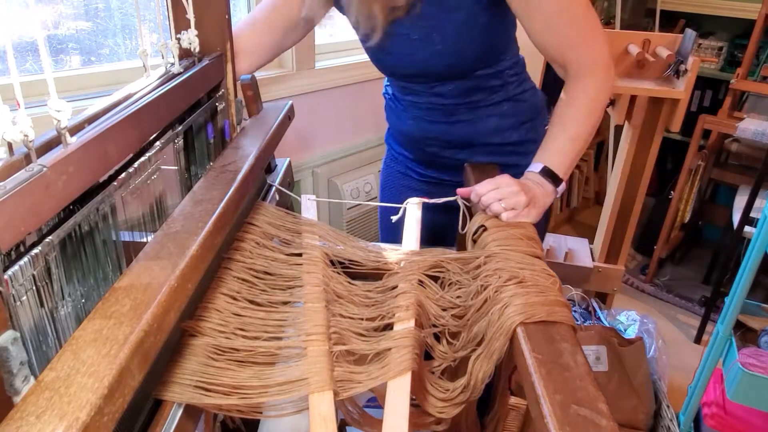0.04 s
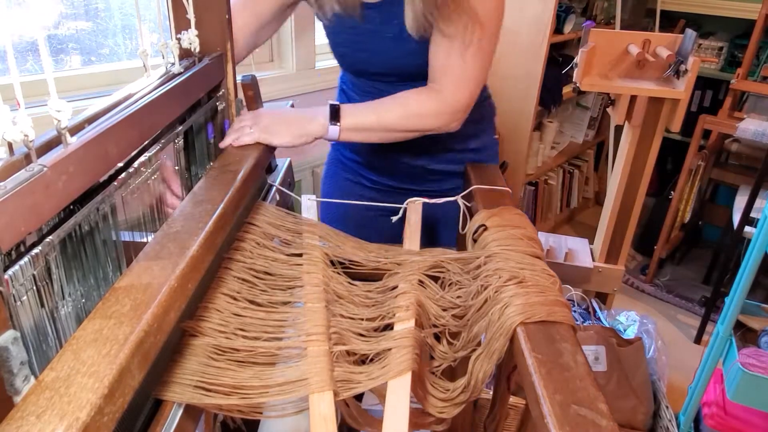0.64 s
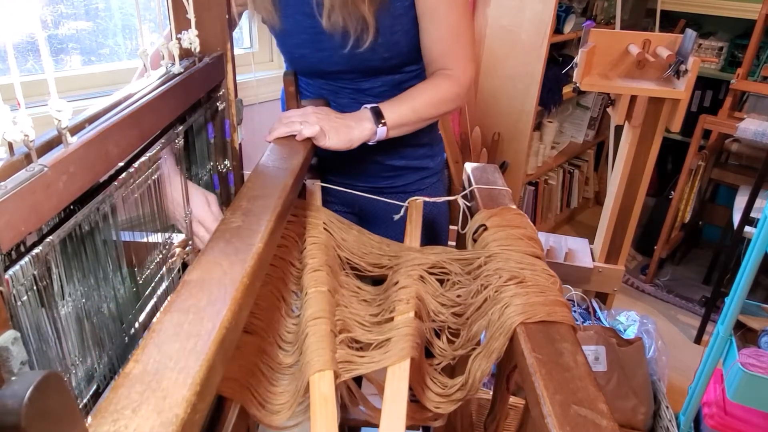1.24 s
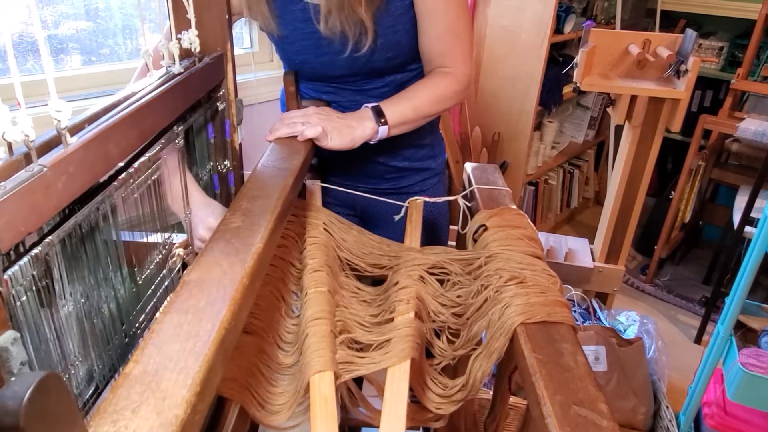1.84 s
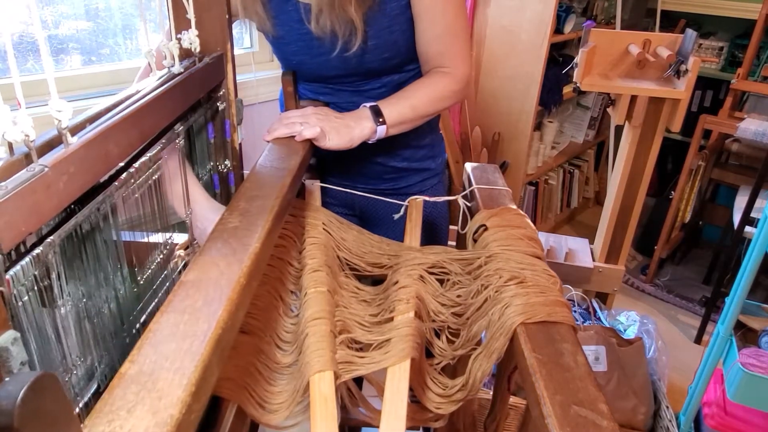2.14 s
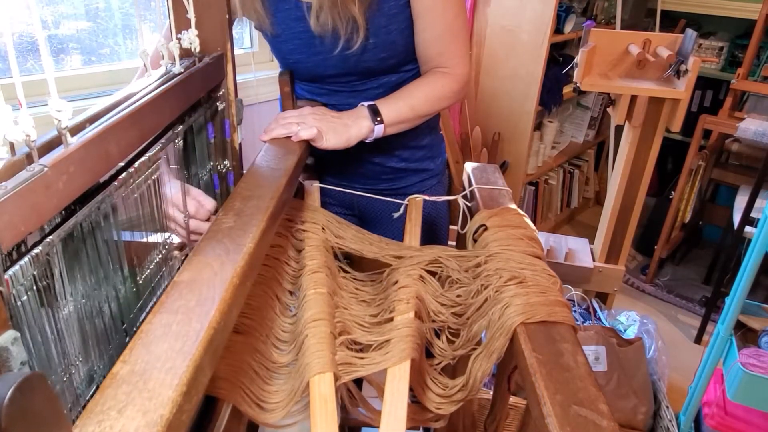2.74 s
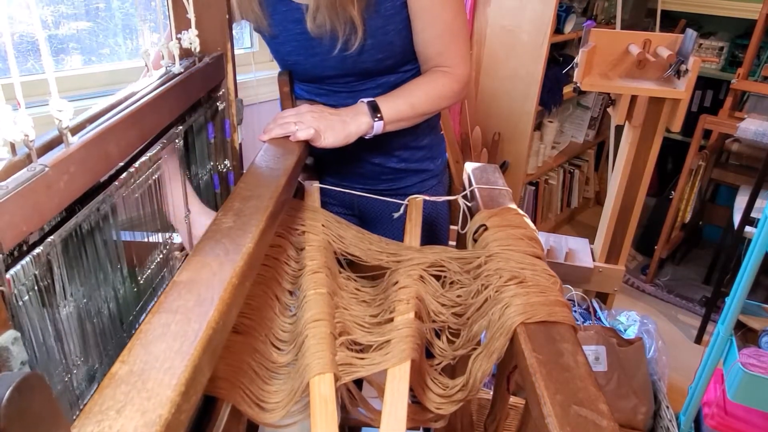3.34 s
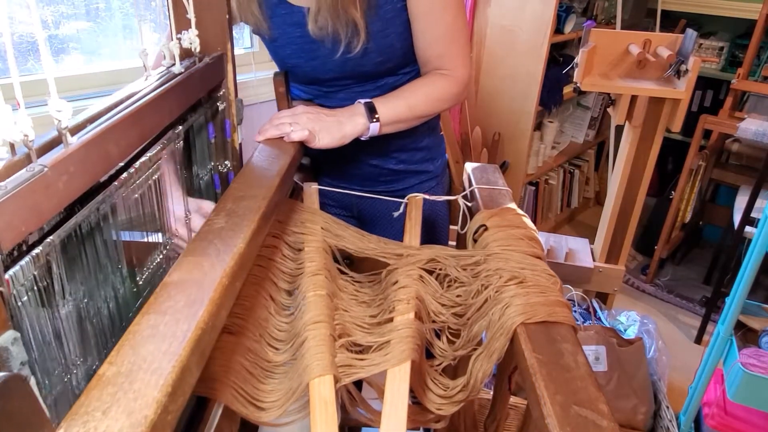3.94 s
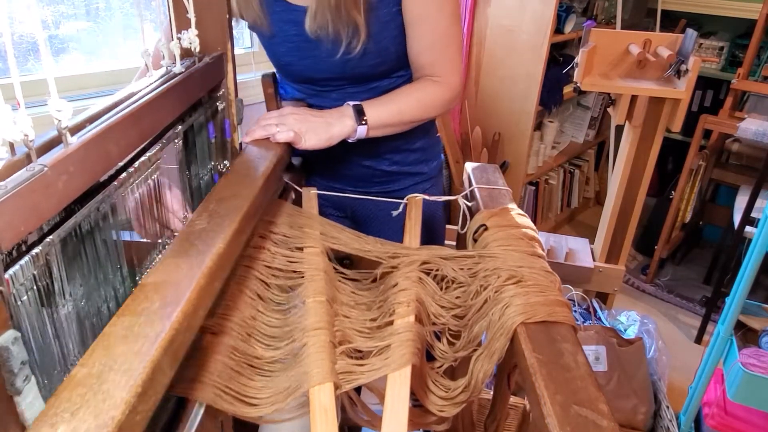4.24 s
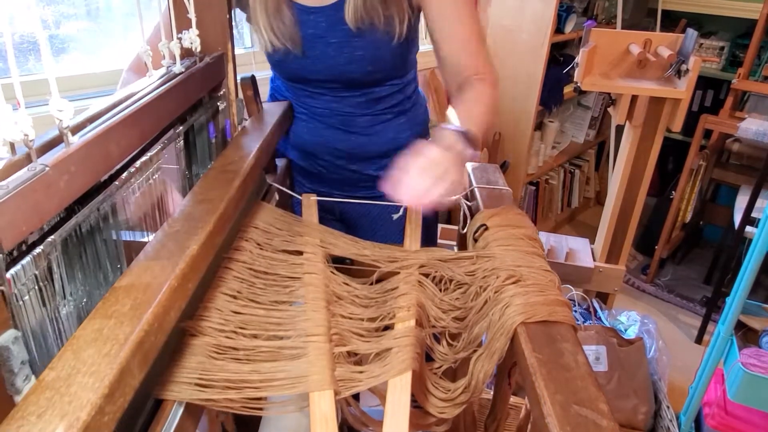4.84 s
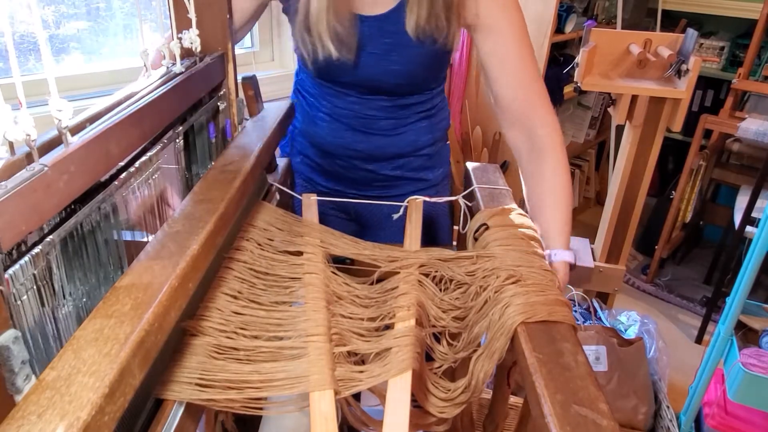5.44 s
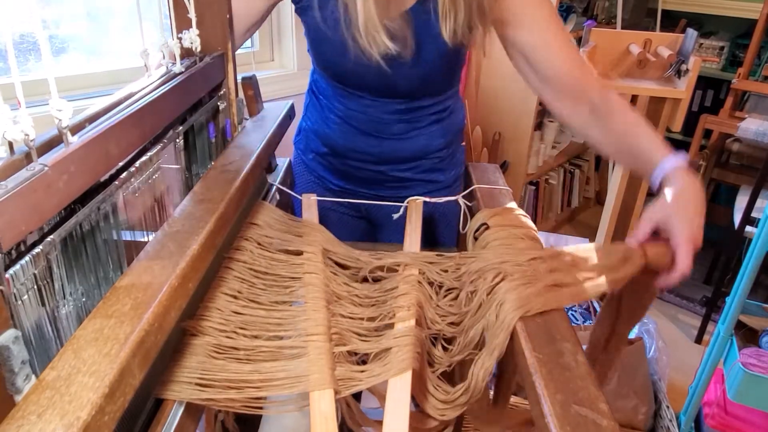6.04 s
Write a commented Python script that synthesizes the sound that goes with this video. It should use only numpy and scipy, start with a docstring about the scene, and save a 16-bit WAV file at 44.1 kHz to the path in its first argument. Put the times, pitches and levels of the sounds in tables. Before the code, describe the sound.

Light wooden knocks and jingling steel wires on a weaving loom, with one sharp metal click and then a dull thump.

```python
"""A wooden floor loom in a small room, close to a stereo microphone, as a weaver spreads the warp.
From the start the wooden frames knock and steel heddles jostle and slide along their rods.
The beater clacks at 1.1 s, the heddles are stirred again, and at 3.6 s a steel rod snaps into its seat.
At 4.5 s the beater swings back with a dull thump; then the jingling thins out into the room's hiss."""
import sys
import numpy as np
from scipy import signal
from scipy.fft import rfft, irfft, next_fast_len
from scipy.io import wavfile
from scipy.ndimage import uniform_filter1d, map_coordinates

SR = 44100
rng = np.random.default_rng(int(sys.argv[2]) if len(sys.argv) > 2 else 0)


def file_out(sig):
    """Save sig as 16-bit WAV at sys.argv[1]."""
    # one column per channel
    cols = np.atleast_2d(sig).T
    # limit, then scale
    lim = np.clip(cols, -1, 1)
    pcm = np.round(lim * 32767).astype(np.int16)
    wavfile.write(sys.argv[1], SR, pcm)


N = 273331

# resonances of the heddle wires: (frequency [Hz], width [Hz], level [dB])
HEDDLE_MODES = [(2330, 35, -35), (2760, 69, -6.5), (2933, 77, -8), (3217, 160, -4.5), (3490, 130, -14),
                (3693, 62, -4), (3890, 120, -7.5), (4480, 410, 0), (5100, 244, -9.5), (5920, 65, -5),
                (6250, 99, -7.5), (7100, 68, -4.5)]
# broad ring of the steel beneath them: (frequency [Hz], level [dB])
STEEL_COLOUR = [(900, -30.5), (1800, -21), (2600, -7.5), (3200, 1), (4400, -3.5), (5500, -7), (7100, -9),
                (8000, -24.5), (11000, -38.5)]
# sizzle of tiny steel contacts: (frequency [Hz], level [dB])
SIZZLE_COLOUR = [(3000, -47), (6500, -9), (8200, -13), (9500, -11), (11000, -7), (13300, -1), (15500, 0)]


def amp(db):
    """Decibels to gain."""
    return 10 ** (np.asarray(db) / 20)


def unit(x):
    """Scale to rms 1."""
    return x / np.sqrt(np.mean(x ** 2) + 1e-20)


def burst(x):
    """Scale a short sound to the energy of 20 ms at rms 1."""
    return x / np.sqrt(np.sum(x ** 2) / (SR * .02) + 1e-20)


def along(points, hz):
    """Read (frequency [Hz], value) points on a log axis."""
    freqs, values = np.transpose(points)
    return np.interp(np.log(hz + 1), np.log(freqs + 1), values)


def wobble(rate):
    """A smooth random curve, rate knots a second."""
    return map_coordinates(rng.standard_normal(int(N * rate / SR) + 4), [np.arange(N) * rate / SR])


def fade(t60):
    """Half a second of exponential decay, falling 60 dB in t60 seconds."""
    return np.exp(-np.log(1000) * np.arange(SR // 2) / SR / t60)


def stroke(s, rise, fall):
    """The samples that a stroke peaking at time s covers, and its strength on each."""
    start = max(round((s - 3 * rise) * SR), 0)
    part = np.arange(start, min(start + SR, N))
    t = part / SR - s
    return part, np.exp(-(t / np.where(t < 0, rise, fall)) ** 2 / 2)


def add(out, s, x):
    """Mix a stereo sound in at time s."""
    start = max(round(s * SR), 0)
    out[:, start:start + x.shape[1]] += x[:, :N - start]


def coloured(x, gain):
    """Causal (minimum-phase) filter with the given gain over frequency."""
    n = x.shape[-1]
    m = 2 * next_fast_len(n // 2 + 4096)
    cepstrum = irfft(np.log(np.maximum(gain(np.fft.rfftfreq(m, 1 / SR)), 1e-6)), m)
    cepstrum[1:m // 2] *= 2
    cepstrum[m // 2 + 1:] = 0
    return irfft(rfft(x, m) * np.exp(rfft(cepstrum)), m)[..., :n]


def shaped(x, spectrum):
    """Colour x with (frequency [Hz], level [dB]) points."""
    return coloured(x, lambda hz: amp(along(spectrum, hz)))


def evened(x, width_hz):
    """Level out the broad humps of a decaying noise, keeping its fine structure."""
    m = 4 * len(x)
    power = np.abs(rfft(x, m)) ** 2
    humps = np.abs(uniform_filter1d(power, max(int(width_hz * m / SR), 1))) + 1e-12
    return coloured(x, lambda hz: np.interp(hz, np.fft.rfftfreq(m, 1 / SR), humps ** -.5))


def ring(modes, scatter_db, max_t60):
    """Struck modes, at new strengths for each blow; neighbours start in opposite directions."""
    t = np.arange(SR // 2) / SR
    out = np.zeros(len(t))
    for k, (hz, db, t60) in enumerate(modes):
        strength = (-1) ** k * amp(db + scatter_db * rng.normal())
        out += strength * np.sin(2 * np.pi * hz * t) * fade(min(t60, max_t60))
    return burst(out)


def crack(spectrum, t60):
    """The dense, quickly dying part of a blow."""
    noise = rng.standard_normal(SR // 2) * fade(t60)
    return burst(shaped(evened(noise, width_hz=306), spectrum))


def contacts(rate, spread_db):
    """Tiny impacts of unequal size, about rate a second; rms 1."""
    size = np.minimum(rng.standard_normal(N), 2)
    hits = rng.random(N) < rate / SR
    return unit(hits * rng.choice([-1, 1], N) * amp(spread_db * size))


def spread(mid, side, hz):
    """The microphone's two close capsules hear diffuse bass alike and diffuse treble unrelated."""
    # likeness of the room's sound left and right: (frequency [Hz], correlation [-1..1])
    likeness = [(100, 0.79), (250, 0.31), (500, 0.5), (1000, -0.2), (2500, -0.069), (5000, -0.091),
                (9000, -0.16)]
    turn = np.arccos(np.clip(along(likeness, hz), -1, 1)) / 2
    common, apart = np.cos(turn) * mid, np.sin(turn) * side
    return np.array([common + apart, common - apart])


def diffuse_noise(spectrum):
    """Coloured stereo noise reaching the microphone from all sides; rms 1."""
    mid, side = rfft(shaped(rng.standard_normal((2, N)), spectrum))
    return unit(irfft(spread(mid, side, np.fft.rfftfreq(N, 1 / SR)), N))


def in_room(x, wet_db):
    """Direct sound plus a fresh diffuse tail for each capsule; the total energy is kept."""
    # reverberation of the small room: (frequency [Hz], t60 [s])
    decay_times = [(80, 0.62), (400, 0.31), (1000, 0.31), (4000, 0.27), (9000, 0.27), (15000, 0.2)]
    hz, t, noise = signal.stft(rng.standard_normal((2, SR // 2)), SR, nperseg=256)
    decay = np.exp(-np.log(1000) * t / along(decay_times, hz)[:, None])
    _, tails = signal.istft(spread(*noise, hz[:, None]) * decay, SR, nperseg=256)
    tails = tails[:, :SR // 2] * (1 - fade(0.0033))
    response = amp(wet_db) * tails / np.linalg.norm(tails, axis=1, keepdims=True)
    response[:, 0] += 1  # the direct path
    return signal.fftconvolve(x[None], response, axes=1)[:, :len(x)] / np.sqrt(1 + amp(wet_db) ** 2)


def room_tone():
    """The quiet room and the microphone's hiss."""
    # steady noise floor: (frequency [Hz], level [dB])
    floor_colour = [(15, -49), (25, -13), (76, -5.5), (216, -14.5), (261, -21.5), (449, -18), (710, -23.5),
                    (2150, -26.5), (3220, -21), (3990, -18.5), (6490, -13), (8050, -25), (10800, -31.5),
                    (15800, -24.5)]
    return amp(-72) * diffuse_noise(floor_colour)


def sway():
    """The frame rumbles faintly under the hands and swells with each lean."""
    # a hand leans on the frame: (peak time [s], level [dB])
    leans = [(.35, -63), (.85, -62), (1.14, -66), (2.02, -73), (2.77, -71), (4.73, -70)]
    # the frame's rumble: (frequency [Hz], level [dB])
    rumble_colour = [(20, -21), (38, -11), (70, 7), (110, -1.5), (170, -13), (300, -15.5), (700, -36.5),
                     (2000, -66)]
    resting_db = -76.5
    load = amp(resting_db + 1.43 * wobble(1.7))
    for s, db in leans:
        part, push = stroke(s, rise=.05, fall=0.057)
        load[part] += amp(db) * push
    return load * diffuse_noise(rumble_colour)


def rubs():
    """Wood and thread drag across the beams, setting off dense runs of tiny slips."""
    # each drag: (peak time [s], level [dB], rise [s])
    drags = [(.177, -66, 0.011), (.745, -60, 0.038), (.98, -64.5, .045), (1.048, -62, 0.024),
             (2.22, -60.5, 0.009), (2.594, -63.5, .016), (3.355, -66, .015), (4.03, -67, .015),
             (4.39, -84, 0.085), (4.529, -55, 0.0096), (4.562, -36.5, 0.0051), (5.075, -59, 0.016),
             (5.57, -83, 0.16)]
    # the slipping timbers: (frequency [Hz], level [dB])
    drag_colour = [(100, -7), (350, -7.5), (700, -2), (880, 0), (1050, -3.5), (1300, -3.5), (1700, -17),
                   (3000, -11.5), (8000, -26)]
    out = np.zeros((2, N))
    slips = unit(shaped(contacts(rate=1200, spread_db=0.5), drag_colour))
    for s, db, rise in drags:
        part, push = stroke(s, rise, fall=1.25 * rise)
        add(out, part[0] / SR, amp(db) * in_room(push * slips[part], wet_db=5))
    return out


def wires(x, body_db):
    """Contacts x excite the heddles' narrow resonances, which stand on a broad steel ring."""
    def gain(hz):
        peaks = sum(amp(db) ** 2 / (1 + (2 * (hz - centre) / width) ** 2)
                    for centre, width, db in HEDDLE_MODES)
        return amp(along(STEEL_COLOUR, hz)) * np.sqrt(amp(body_db) ** 2 + peaks)
    return unit(coloured(x, gain))


def bunch(x, depth_db, spacing_hz):
    """Every bunch of heddles has its own irregular set of resonances."""
    knots = rng.standard_normal(512)
    ripple = lambda hz: amp(depth_db * map_coordinates(knots, [hz / spacing_hz], mode="mirror"))
    return unit(coloured(x, ripple))


def jingle(rate, detune, t60):
    """Single free heddles ring briefly, each near one of the wire resonances; rms 1."""
    centres, _, levels = np.transpose(HEDDLE_MODES)
    when, pick = rng.random((2, int(rate * N / SR)))
    tune, size = rng.standard_normal((2, len(when)))
    mode = (pick * len(centres)).astype(int)
    hz = centres[mode] * np.exp(detune * tune)
    gain = amp(levels[mode] + along(STEEL_COLOUR, hz) + 2.4 * size)
    step = np.arange(SR // 16)
    pings = gain[:, None] * np.sin(2 * np.pi * hz[:, None] * step / SR) * fade(t60)[step]
    samples = (when * N).astype(int)[:, None] + step
    return unit(np.bincount(samples.ravel(), pings.ravel(), N)[:N])


def jostle():
    """Hundreds of hanging heddles touch; the ring shifts as the hand passes from bunch to bunch."""
    # how strongly the hand stirs them: (time [s], level [dB])
    stirring = [(0.0, -69), (0.59, -80.5), (0.81, -65), (1.03, -72), (1.16, -75.5), (1.62, -81.5),
                (1.78, -72.5), (1.91, -95), (2.28, -65.5), (2.41, -58), (2.54, -60), (3.26, -69.5),
                (3.76, -60), (4.7, -59.5), (4.9, -65), (5.25, -67), (5.56, -75), (6.2, -76.5)]
    stir_db = np.interp(np.arange(N) / SR, *np.transpose(stirring))
    flicker_db = 2.4 * wobble(21.82)
    ring_db = stir_db + flicker_db + 1.5
    sizzle_db = -61.5 + .6 * (stir_db + 67) + flicker_db  # grows more slowly than the ring
    bunches = np.zeros(N)
    for _ in range(4):
        share = amp(3.1 * wobble(7))
        ringing = wires(contacts(rate=900, spread_db=9), body_db=-5.5)
        bunches += share * bunch(ringing, depth_db=2.5, spacing_hz=90.2)
    # the bunches take turns at an even level, so the hand's effort sets the loudness
    bunches /= np.sqrt(np.abs(uniform_filter1d(bunches ** 2, SR // 12)) + 1e-12)
    steel = unit(bunches + 0.79 * jingle(rate=260, detune=.025, t60=0.053))
    sizzle = unit(shaped(contacts(rate=3400, spread_db=13.5), SIZZLE_COLOUR))
    return in_room(amp(ring_db) * steel, wet_db=4.5) + in_room(amp(sizzle_db) * sizzle, wet_db=11)


def slides():
    """A pushed bunch scrapes along the rod: a quick swell of dense contacts and ringing wires."""
    # each push: (peak time [s], ring level [dB], rise [s], sizzle relative to ring [dB])
    pushes = [(0.185, -53, 0.01, 16.5), (.565, -63.5, 0.011, 5.5), (.635, -45, 0.013, 6.5),
              (0.667, -43, 0.01, 8), (.745, -53.5, 0.015, 4.5), (.975, -60.5, 0.043, 3.5),
              (1.408, -56, 0.0056, -1), (1.8, -70, 0.043, -3), (1.96, -60.5, 0.058, -1),
              (2.444, -52.5, 0.0025, 9.5), (2.958, -58, 0.0048, 4), (3.18, -59, 0.019, -1),
              (3.224, -49.5, 0.0078, 2), (3.286, -54.5, 0.015, 3.5), (3.322, -46, 0.006, 2),
              (3.495, -55.5, 0.0073, 6), (4.019, -51, 0.016, 5.5), (4.067, -51.5, 0.006, 6.5),
              (4.154, -74, 0.0055, 19), (4.765, -54.5, 0.015, 0.5), (5.32, -59, 0.024, -4),
              (5.77, -66, 0.036, -7)]
    out = np.zeros((2, N))
    ringing = wires(contacts(rate=1800, spread_db=1), body_db=-4)
    sizzle = unit(shaped(contacts(rate=4500, spread_db=5.0), SIZZLE_COLOUR))
    for s, db, rise, sizzle_db in pushes:
        part, push = stroke(s, rise, fall=1.38 * rise)
        scrape = bunch(ringing[part], depth_db=3.0, spacing_hz=110.16)
        scrape += amp(sizzle_db) * bunch(sizzle[part], depth_db=6.5, spacing_hz=156.2)
        add(out, part[0] / SR, amp(db) * in_room(push * scrape, wet_db=4.5))
    return out


def ticks():
    """One heddle flicks against its neighbour and may ring on."""
    # each flick: (time [s], click level [dB], ring relative to click [dB])
    flicks = [(1.092, -35.5, -29), (1.110, -46, -20), (1.339, -65.5, 1), (1.403, -60.5, 5.5),
              (2.437, -55, -3), (3.467, -61, -1), (3.983, -52.5, -14), (4.492, -53, -20), (4.958, -69, 5),
              (5.067, -51, -16), (5.122, -56, -23), (5.143, -56, -18), (5.723, -68, -1.5),
              (6.092, -68, -28)]
    # click of wire on wire: (frequency [Hz], level [dB])
    click_colour = [(1000, -26.5), (3500, -10), (6800, -2), (8500, -15.5), (14000, -1.5)]
    # one heddle ringing alone: (frequency [Hz], level [dB], t60 [s])
    wire_modes = [(3010, -13, .08), (3255, -7, .1), (3480, -5, 0.063), (3625, -2, 0.12), (3700, -6.5, .08),
                  (4500, -10, .06)]
    out = np.zeros((2, N))
    for s, db, ring_db in flicks:
        click = crack(click_colour, t60=0.018)
        ping = amp(ring_db) * ring(wire_modes, scatter_db=4.0, max_t60=0.13)
        add(out, s, amp(db) * in_room(click + ping, wet_db=2))
    return out


def thump():
    """The whole loom shakes on the floor."""
    # its low modes: (frequency [Hz], level [dB], t60 before the cap [s])
    loom_modes = [(42.3, -2, 0.085), (57.4, 1.5, 0.39), (79.3, 0.5, 0.22), (89.6, -7.5, 0.32),
                  (120.8, 6.5, 0.15), (148.3, 4, 0.29), (187.6, -2.5, 0.2)]
    # the dull thud: (frequency [Hz], level [dB])
    thud_colour = [(30, -21.0), (110, 1.5), (220, -17), (400, -25.0), (1200, -64)]
    boom = ring(loom_modes, scatter_db=-0.5, max_t60=0.37)
    thud = amp(-4.5) * crack(thud_colour, t60=0.094)
    return in_room((boom + thud) * (1 - fade(.03)), wet_db=-8)


def knocks():
    """Wood on wood: soft contacts build slowly and lose their treble; heavy ones wake the low modes."""
    # each blow: (time [s], level [dB], hardness as a cutoff [Hz], weight on the low modes [dB])
    blows = [(.004, -60.5, 544, -2.5), (.177, -47, 11000, 3), (.188, -47, 8200, 2), (.540, -69, 2000, -2),
             (.604, -59.5, 900, -7), (.725, -51, 3080, -3), (.760, -50, 3180, -19), (.934, -57, 4630, -18),
             (1.091, -35.5, 3360, -10), (1.110, -40.5, 2600, -10), (1.54, -66, 2470, -8),
             (1.946, -65, 544, -3.5), (2.211, -55.5, 1590, 5), (2.236, -55, 600, 8), (2.309, -57.5, 506, 1),
             (2.493, -70.5, 1490, -12), (2.583, -61, 1930, -0.5), (2.678, -63, 487, 8),
             (3.346, -61, 1200, -8), (3.487, -63.5, 800, 3), (3.552, -56, 1980, -32),
             (3.578, -46.5, 2030, -9), (3.686, -55, 705, -5.5), (3.741, -66, 700, -4),
             (4.021, -58, 1320, -5.5), (4.066, -71, 1300, -14), (4.528, -43, 3780, -10),
             (4.563, -39, 890, -2), (5.067, -49.5, 2000, -3.5), (5.120, -64.5, 554, 17)]
    # the frame's timbers: (frequency [Hz], level [dB], t60 before the cap [s])
    timber_modes = [(225, -30, 0.04), (356, -0.5, 0.085), (502, -1.5, 0.28), (562.5, -3.5, 0.11),
                    (668.6, 9, 0.037), (856.5, 1.5, 0.071), (908, -4.5, 0.15), (1206, -1, 0.06),
                    (1329, 1, 0.062), (1590, -2, 0.067), (1990, -22, 0.112), (2314, 0.5, 0.087),
                    (2820, -8, 0.3)]
    # crack of the wood: (frequency [Hz], level [dB])
    crack_colour = [(100, -7.5), (300, -2.5), (500, -1), (700, 3), (900, -2), (1400, -1), (2000, -1),
                    (3000, -1), (7200, 3), (8200, -4), (10000, 3), (15000, -12)]
    out = np.zeros((2, N))
    for s, db, hard_hz, weight_db in blows:
        blow = ring(timber_modes, scatter_db=6, max_t60=0.15)
        blow += amp(14.0) * crack(crack_colour, t60=0.057)
        press = 1 - fade(9 / hard_hz)
        contact = lambda hz: amp(weight_db / (1 + (hz / 620) ** 6)) / (1 + (hz / hard_hz) ** 2)
        add(out, s, amp(db) * in_room(burst(coloured(press * blow, contact)), wet_db=10.5))
        shake_db = db - 7.5 - 10 * np.log2(hard_hz / 700)  # each octave harder shakes the loom less
        add(out, s, amp(shake_db) * thump())
    return out


def beater():
    """The beater's bar gives a hollow clack at either end of its swing; its weight thumps the frame."""
    # it meets its stops: (time [s], level [dB])
    stops = [(1.093, -43), (1.112, -45), (4.562, -42)]
    # its long top bar: (frequency [Hz], level [dB], t60 before the cap [s])
    bar_modes = [(727, -6, 0.073), (864, 3.5, .1), (911, 8.5, .1), (960, 1.5, 0.098), (1157, -0.5, .1),
                 (1683, -15, 0.11), (2440, -6, .18)]
    # its weight lands: (time [s], level [dB])
    landings = [(0.656, -55.5), (4.528, -36.5), (4.563, -44)]
    out = np.zeros((2, N))
    for s, db in stops:
        add(out, s, amp(db) * in_room(ring(bar_modes, scatter_db=2, max_t60=.15), wet_db=-11.5))
    for s, db in landings:
        add(out, s, amp(db) * thump())
    return out


def rod():
    """A steel rod snaps into its seat, a little to the left: a hard crack and a short ring."""
    # it snaps home and chatters: (time [s], level [dB])
    snaps = [(3.576, -27), (3.5814, -34.5), (3.589, -35.5)]
    # crack of the steel: (frequency [Hz], level [dB])
    snap_colour = [(900, -21.5), (2200, -21), (2600, -7), (3100, -9), (3700, 1.5), (4600, 2), (5300, -5.5),
                   (5700, -11.5), (7000, -14.5), (8100, -20), (9700, -15.5), (12000, -29.5), (14500, -26.5)]
    # the rod's clustered modes: (frequency [Hz], level [dB], t60 before the cap [s])
    rod_modes = [(2560, -10, 1.6), (3548, 2, 0.25), (3510, -4.5, 0.067), (3715, 4.5, 0.18),
                 (3970, -10, 0.23), (4010, -25, 1.5), (4161, -16, 0.24), (4470, -24, 0.21),
                 (4620, -10, 0.15), (4940, -6, 0.36), (5360, -11, 0.37)]
    pan = amp([[.8], [-.8]])
    out = np.zeros((2, N))
    for s, db in snaps:
        edge = crack(snap_colour, t60=.026)
        clang = amp(-4.5) * ring(rod_modes, scatter_db=3, max_t60=0.098)
        add(out, s, amp(db) * pan * in_room(edge + clang, wet_db=4.5))
    return out


def scene():
    """The loom close up over the room tone; its treble reaches the left capsule more strongly."""
    # balance at the microphone: (frequency [Hz], left over right [dB])
    left_lift = [(2000, 0), (4500, 0.5), (8000, 3.5), (15000, 7)]
    left, right = knocks() + beater() + rubs() + rod() + jostle() + slides() + ticks()
    loom = np.array([coloured(left, lambda hz: amp(along(left_lift, hz) / 2)),
                     coloured(right, lambda hz: amp(-along(left_lift, hz) / 2))])
    return loom + sway() + room_tone()


def record(dry):
    """The recorder keeps nothing above its band limit."""
    top_hz, edge_hz = 15850, 150
    m = next_fast_len(N + SR // 2)
    passband = np.clip((top_hz - np.fft.rfftfreq(m, 1 / SR)) / edge_hz + .5, 0, 1)
    return irfft(rfft(dry, m) * passband, m)[:, :N]


dry = scene()
out = record(dry)
file_out(out)
```